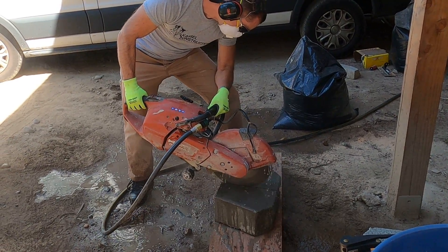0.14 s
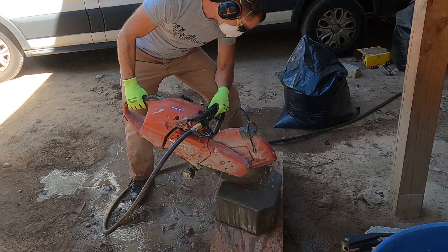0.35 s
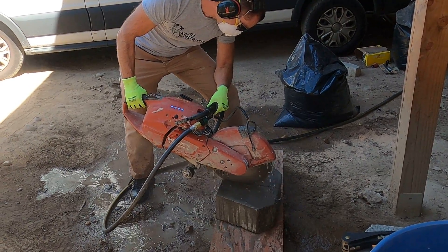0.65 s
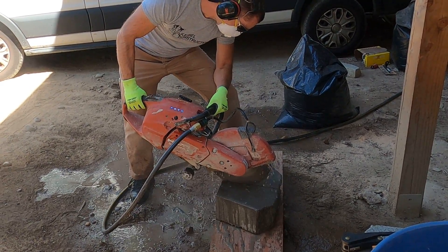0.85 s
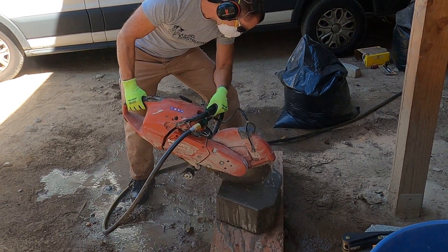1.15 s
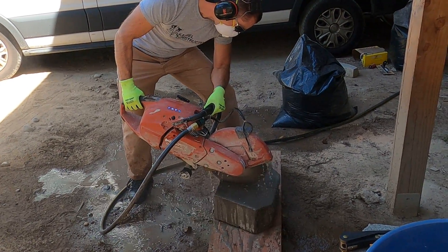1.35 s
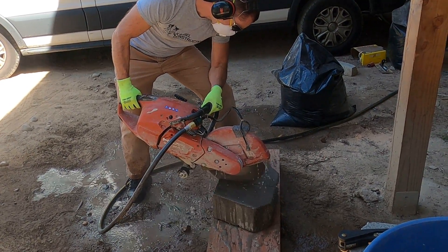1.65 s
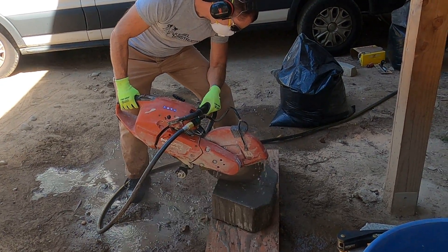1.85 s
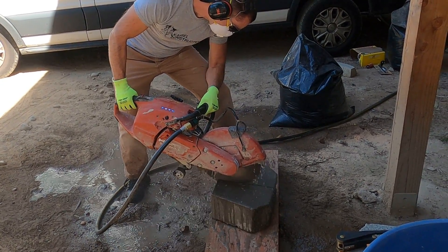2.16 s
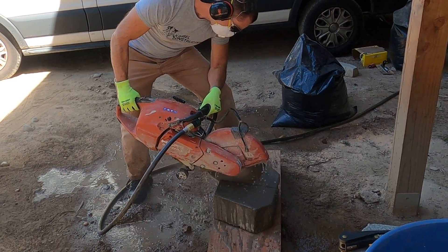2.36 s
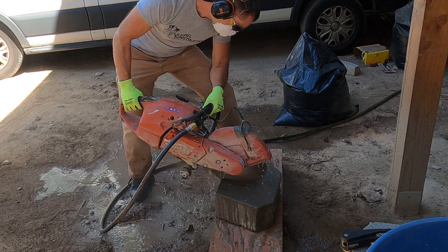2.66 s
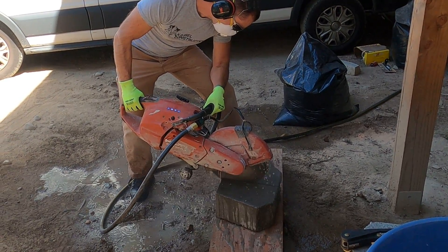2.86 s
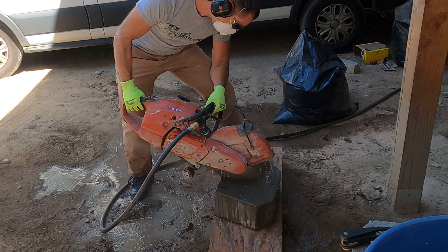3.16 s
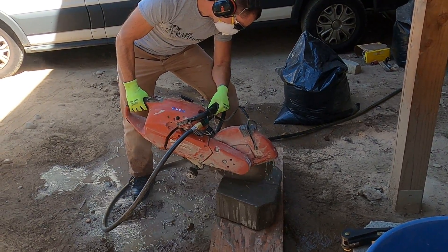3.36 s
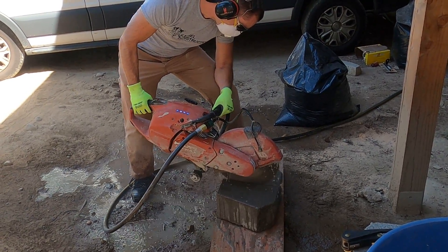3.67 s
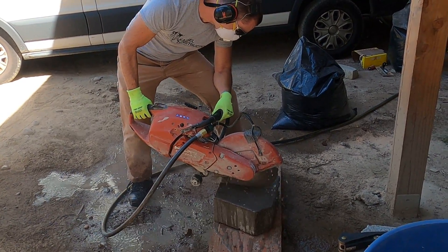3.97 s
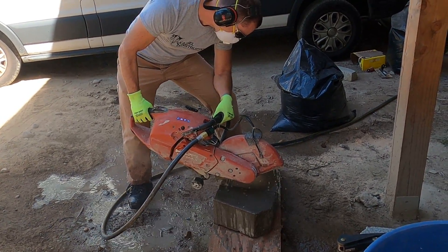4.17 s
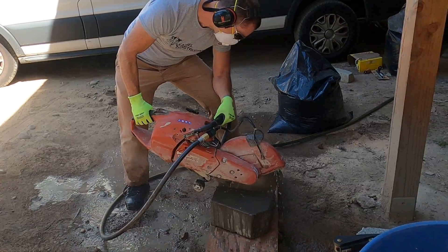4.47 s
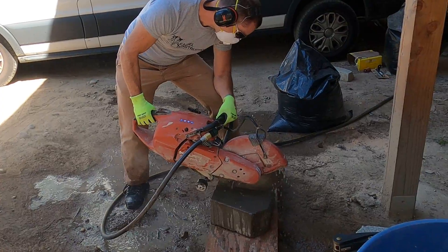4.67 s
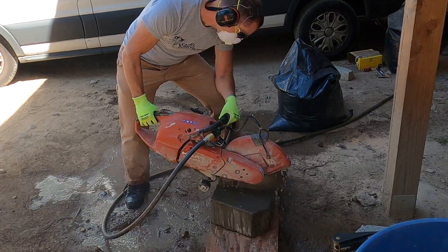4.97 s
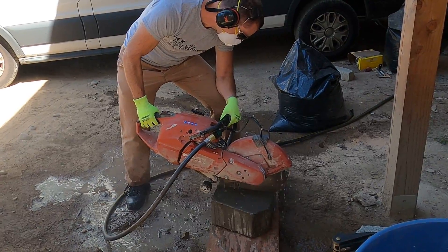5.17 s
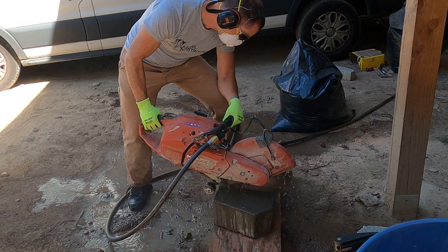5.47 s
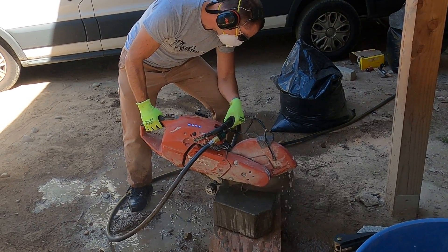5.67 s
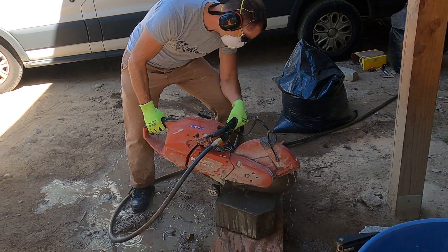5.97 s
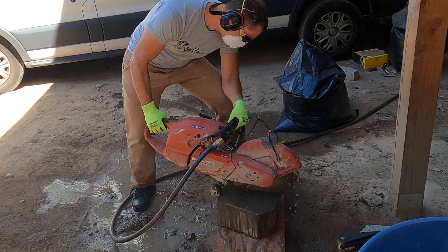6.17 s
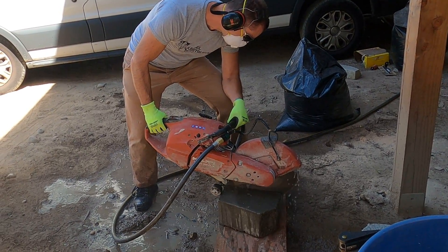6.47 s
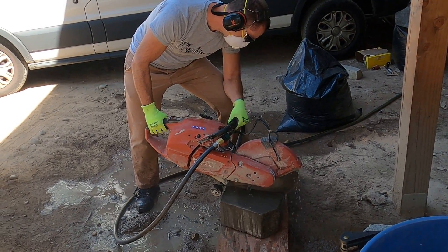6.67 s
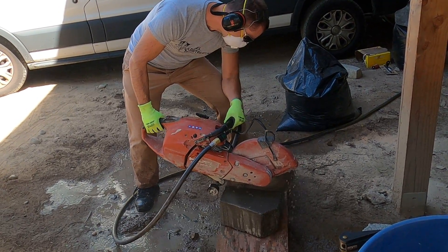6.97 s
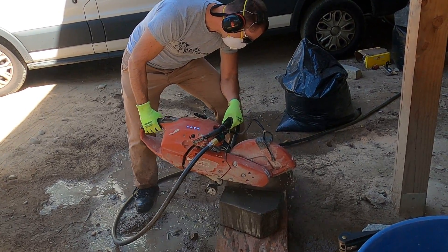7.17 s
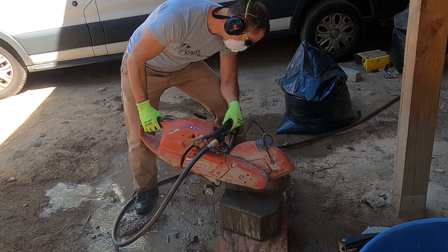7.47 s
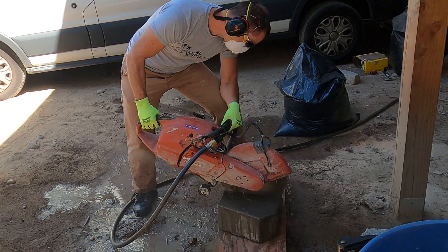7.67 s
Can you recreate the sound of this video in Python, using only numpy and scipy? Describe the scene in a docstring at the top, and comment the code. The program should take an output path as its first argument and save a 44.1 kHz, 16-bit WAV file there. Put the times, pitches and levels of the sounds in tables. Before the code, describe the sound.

Close, harsh roar of a saw blade tearing concrete, with sagging engine drone and faint water hiss, ending in a rising rev.

```python
"""Petrol saw cutting concrete

Grit tears at the rim of a saw blade: random clicks ring the steel blade and its guard, over broad noise.
A one-cylinder engine, built from sine waves, sags under load and revs up as the blade runs out of the cut.
Water spray hisses as filtered clicks; so does an airy top-treble hiss, stronger on the left.
A small microphone pair close by cuts the bass, and the peaks are evened out.
"""
import sys
import numpy as np
from scipy import signal
from scipy.fft import rfft, irfft, next_fast_len
from scipy.io import wavfile
from scipy.ndimage import uniform_filter1d, minimum_filter1d

SR = 44100
rng = np.random.default_rng(int(sys.argv[2]) if len(sys.argv) > 2 else 0)


def to_wav(s):
    """Save 16-bit WAV."""
    ch = np.atleast_2d(s).T  # columns
    pcm = np.round(np.clip(ch, -1, 1) * 32767)  # PCM
    wavfile.write(sys.argv[1], SR, pcm.astype(np.int16))


N = 344862

# All levels in the tables are relative: later gains add to them.
# Progress of the cut: (time [s], depth [0-1], run-out [0-1])
CUT_PROGRESS = [(0, 0.3, 0), (1, 0.6, 0.06), (2, 0.63, 0.04), (3, 0.64, 0.09), (4, 0.88, 0.03),
                (5, 0.92, 0), (6.1, 1, 0.09), (6.5, 0.98, 0.35), (6.8, 0.56, 0.29), (7.2, 0.66, 0.54),
                (7.82, 1, 0.54)]
# Engine speed: (time [s], firing rate [Hz])
ENGINE_SPEED = [(0.0, 87.8), (0.6, 86.6), (1.0, 85.2), (1.22, 85.7), (1.61, 83.3), (2.4, 81.6), (2.6, 80.6),
                (3.5, 79.6), (3.72, 78.0), (4.35, 78.3), (4.7, 76.6), (5.34, 76.8), (5.9, 78.0),
                (6.16, 77.2), (6.38, 85.2), (6.64, 97.6), (6.79, 108.9), (7.1, 127.9), (7.19, 132.0),
                (7.49, 135.5), (7.62, 138.0), (7.82, 140.4)]
# Loudness over time: (time [s], grinding [dB], spray and airy hiss [dB])
LOUDNESS_CURVE = [(0, -13, -32), (1.5, -14, -30.5), (3.2, -13.5, -29), (4.7, -15, -29.5), (6, -15, -30.5),
                  (6.8, -12, -31), (7.82, -13, -33.5)]
# Brief changes of the grinding, nearly all dips: (time [s], level [dB], half width [s])
GRINDING_DIPS = [(.07, -3, .03), (.38, -3, 0.015), (.83, -2, 0.026), (1.42, 0.5, .02), (2.29, -0.5, .02),
                 (2.86, -2.5, 0.048), (4.39, -0.5, .03), (4.86, -1, 0.035), (6.75, -3.5, 0.027),
                 (7.41, -4, 0.018)]

# Ringing pitches (modes) of the steel blade and of its guard: (pitch [Hz])
BLADE_PITCHES = [3850, 3970, 4182, 4290, 4380, 4455, 4530, 4655, 4775, 4920, 5050, 5145, 5255, 5660, 5750,
                 5940, 6170, 6240, 6520, 6780, 7295, 7555, 7740, 8110, 8420, 8680, 9165, 9360, 9670, 10870,
                 11470]
GUARD_PITCHES = [535, 778, 1575, 1760, 2020, 2380, 2570, 2830, 2965, 3180, 3320, 3470, 3660]
# How the grit rings each of those pitches, one row a pitch:
# (width [Hz], shallow cut [dB per Hz], deep cut [dB per Hz], running free [dB per Hz])
BLADE_MODES = [(97, -58, -50, -65), (223, -54.5, -44, -46), (60, -36, -38, -67), (121, -51, -43.5, -43.5),
               (70, -58, -67, -47), (50, -38, -39, -69), (63, -34.5, -41.5, -55), (38.6, -47, -34, -55),
               (46.4, -35.5, -47.5, -69), (90, -47, -45, -70), (81, -58.5, -37.5, -60), (47, -46, -38, -56),
               (60, -55, -44, -75), (70, -53.5, -48, -61), (80, -55, -45.5, -58), (202, -82, -48.5, -55.5),
               (70, -72, -65, -81), (58, -62, -44, -82), (69, -52, -51.5, -69), (60, -59, -56, -72),
               (70, -64.5, -57.5, -71), (70, -58.5, -59, -71), (50, -73, -69, -74), (90, -65, -65, -70),
               (70, -76, -60, -69), (70, -91, -74, -66), (60, -68, -57.5, -69), (50, -70, -57, -74),
               (70, -73, -70, -77), (100, -67, -64.5, -74), (140, -68, -64, -78)]
GUARD_MODES = [(86, -43, -50, -60.5), (59, -50.5, -52.5, -55), (86, -47, -51, -61), (29.7, -48, -58, -47),
               (107, -48, -41.5, -55), (137, -45, -44.5, -48.5), (139, -47.5, -51, -48),
               (61.5, -55, -53, -48), (56, -56, -52, -46), (72, -64, -61, -28), (95, -56.5, -44.5, -54),
               (86, -63, -44.5, -58), (91, -55, -43, -48)]
# Blade pitches move as it spins faster: (pitch [Hz], shift when the squared speed doubles [share of pitch])
SPIN_SHIFTS = [(4500, 0.0028), (5200, 0.014), (7300, 0.0064), (9200, -0.0061)]
# Pitches that slide as the kerf (the slot) deepens: pitch [Hz]: slide over the whole depth [Hz]
KERF_SLIDES = {2020: 70, 4182: 35, 4530: 80, 4775: 100, 5145: 50, 5750: -80, 7295: -110, 7555: 60, 9165:
               -90}
# Pitches that ring up for a while: pitch [Hz]: (time [s], level [dB], half width [s])
RINGING_SWELLS = {2020: (5.9, 3.5, 0.65), 4182: (4.8, 2, 0.75), 4655: (2.4, 1.7, 0.7),
                  4775: (3.2, 5.8, 0.72), 5050: (2.4, 3.4, 0.76), 6240: (3.8, 3, 1), 6520: (3, 4, 0.51),
                  7295: (1.0, 3, 1.0), 7555: (4.45, 8.4, 0.28), 8110: (5, 3.3, .8), 8420: (6, 2.5, .7),
                  8680: (.4, 8, .7), 9165: (2.2, 7.5, 0.91), 9360: (2.4, 8.2, 1.2)}
# Broad tearing noise in the cut: (pitch [Hz], level [dB per Hz])
GRIT_SPECTRUM = [(300, -10.5), (540, -1.5), (640, -7.5), (780, -3), (1090, -8), (1500, -3), (2300, 1.5),
                 (3100, -6.5), (3700, 2.5), (4700, -1.5), (5450, -5), (6600, -6.5), (6950, -29),
                 (9000, -55)]
# Broad noise of the free-running saw: (pitch [Hz], level [dB per Hz])
WHIRR_SPECTRUM = [(180, -69), (300, -35), (325, -5), (408, -2.5), (449, -14), (527, 2), (579, -5.5),
                  (727, 5.5), (1150, -11), (1350, 3), (1540, -17), (1960, -31), (4270, -9), (5600, -18),
                  (7400, -19), (9620, -55), (16300, -120)]

# Colour the exhaust pipe gives the firing orders (multiples of the firing rate): (pitch [Hz], level [dB])
PIPE_SPECTRUM = [(300, -6.5), (400, -8.5), (470, -0.5), (580, 0.5), (640, -8), (760, -1.5), (1000, -13),
                 (1500, -23.5), (1780, -10), (2000, -17), (2600, -25)]
# Level of all firing orders: (lightly loaded [dB], bogged down [dB], revving free [dB])
ENGINE_LEVELS = (-31, -34.5, -26.5)
# Narrow muffler tones; each triple is lightly loaded, bogged down, revving free:
# (three pitches [Hz], width [Hz], three levels [dB], gain while speeding up [dB])
MUFFLER_TONES = [((365, 367, 370), 28, (-36, -35, -36), 9.6), ((528, 463, 537), 95, (-23, -31.5, -37),
                 18.4), ((1195, 1196, 1060), 114, (-24, -42, -39), 5.7), ((1333, 1333, 1357),
                 160, (-24.5, -28.5, -17.5), 1.7)]
# Each order against the pipe's colour, from the third order up:
# (lightly loaded [dB], half loaded [dB], bogged down [dB], revving free [dB])
ORDER_LEVELS = [(10, 19, 18, 2.5), (3, 1.5, -0.5, -3), (1.5, -11, -3.5, -1.5), (-1, -2.5, -0.5, 2),
                (7, -0.5, 3, -7), (-2, 6, 2.5, 1.5), (0, -8, 2, -3), (3, -4, 3, 2), (6, 3, 0, 3),
                (5, 6, 3.5, -5), (-8, 1, -5, 4), (-3, 2, 3.5, -8), (-11, -4.5, -3.5, 8), (1, -20, -1.5, 15),
                (1, -3, -0.5, 5), (0, -3, -0.5, 4), (-2, -2, 4, 6), (2, 0, 0, 0), (-10, -2, 0, 5),
                (8, 0, 0, 0)]
# Orders that flare up or fade for a moment: order: (time [s], level [dB], half width [s])
ORDER_FLARES = {3: (6.87, 3, .08), 4: (6.53, 6, .09), 5: (6.75, 7, .12), 6: (6.4, 4, .1), 7: (0.6, -3, .7),
                8: (6.35, 5, .12), 9: (6.33, 6, .12), 10: (6.8, 6, .1), 12: (6.82, 3, .06),
                13: (6.5, 3, .1), 14: (6.62, 4, .09), 15: (2.9, 3, .5), 16: (6.75, 5, .12),
                17: (6.25, 7, .09)}

# Spray hiss common to both sides: (pitch [Hz], level [dB per Hz])
SPRAY_SPECTRUM = [(5500, -16), (7000, -10.5), (7500, -3.5), (7950, -10), (9000, -4), (10150, -5.5),
                  (11000, -8.5), (12500, -12), (12850, -13), (14000, -23), (15200, -40)]
# Airy top-treble hiss, stronger on the left: (pitch [Hz], level [dB per Hz])
AIRY_SPECTRUM = [(10500, -31), (11100, -1), (11800, -5), (12500, -1), (13300, 3), (14200, -20), (15200, -3)]

LIGHT_HZ, HALF_HZ, BOGGED_HZ, FREE_HZ = 87.5, 81.5, 77, 125  # firing rates of the engine's states
RUN_OUT_S = 6.15  # when the engine starts to rev
LOAD_POWER = 6  # the engine's colour changes late in the sag
SURGE_HZ_PER_S = 99  # rise of firing rate that counts as full speeding-up
BLADE_TURNS = .5  # blade turns per firing, set by the belt
MID_DEPTH = .6  # depth at which sliding pitches have their listed value
HISS_DIPS = 1.2  # both hisses dip this many times as deep as the grinding
BASS_CUT_HZ, CUTOFF_HZ = 322, 15150


def amp(db):
    """Turn a level in dB into a gain."""
    return 10 ** (np.asarray(db) / 20)


def rms_one(x):
    """Scale a sound to an average strength (rms) of 1."""
    return x / np.sqrt(np.mean(x ** 2) + 1e-20)


def in_time(rows):
    """Read the columns of a time table as curves, one value a sample."""
    s, *columns = np.transpose(rows)
    return [np.interp(np.arange(N) / SR, s, column) for column in columns]


def at_hz(points, hz):
    """Read a spectrum table at given pitches, on a log-frequency axis."""
    table_hz, values = np.array(points).T
    return np.interp(np.log(hz), np.log(table_hz), values)


def bump(s, db, width_s):
    """Make a smooth rise or dip in dB around one moment."""
    return db * np.exp(-((np.arange(N) / SR - s) / width_s) ** 2)


def drift(rate_hz):
    """Make slow random wandering of rms 1: noise smoothed twice by a one-pole low-pass."""
    # one value per 64 samples is enough; the first 1500 let the filter settle
    r = np.exp(-128 * np.pi * rate_hz / SR)
    noise = rng.standard_normal(N // 64 + 1502)
    slow = signal.lfilter([1], [1, -2 * r, r * r], noise)[1500:]
    return np.interp(np.arange(N) / 64, np.arange(len(slow)), rms_one(slow))


def coloured(x, spectrum):
    """Filter a noise by a spectrum table and scale it to rms 1."""
    size = next_fast_len(N)
    hz = np.maximum(np.arange(size // 2 + 1) * SR / size, 1)
    filtered = irfft(rfft(x, size) * amp(at_hz(spectrum, hz)), size)[:N]
    return rms_one(filtered)


def grains(per_s, spread_db):
    """Make random clicks of uneven size and either sign, with rms 1."""
    sizes = amp(spread_db * np.minimum(rng.exponential(1, N), 5)) * rng.choice([-1, 1], N)
    happens = rng.random(N) < per_s / SR
    return rms_one(sizes * happens)


def rings(pitches, modes, drives, depth, free, flicker_db, wander, spin=0):
    """Ring metal with grit: each mode is a resonance applied twice, and its level and pitch wander."""
    out = np.zeros(N)
    reach = np.maximum.accumulate(depth) - MID_DEPTH  # deepest point of the kerf so far
    for k, (hz, (width_hz, shallow_db, deep_db, free_db)) in enumerate(zip(pitches, modes)):
        r = np.exp(-np.pi * width_hz / SR)
        pitch_share = 1 + at_hz(SPIN_SHIFTS, hz) * spin + wander * drift(0.56)
        moving_hz = KERF_SLIDES.get(hz, 0) * reach + hz * pitch_share
        carrier = np.exp(2j * np.pi * np.cumsum(moving_hz) / SR)
        # shifted down by the moving pitch, low-passed and shifted back: a resonance that glides
        shifted = drives[k % len(drives)] / carrier
        slow = signal.lfilter([(1 - r) ** 2], [1, -2 * r, r * r], shifted)
        cut_db = shallow_db + depth * (deep_db - shallow_db)
        level_db = (1 - free) * cut_db + free * free_db
        if hz in RINGING_SWELLS:
            level_db = level_db + bump(*RINGING_SWELLS[hz])
        gain = np.sqrt(2 * SR) * amp(level_db + flicker_db * drift(4.6))
        out += gain * (slow * carrier).real
    return out


def grinding(bite, firing, depth, free):
    """Grit strikes as random clicks, ringing blade and guard; the same clicks feed the broad noise."""
    drives = [bite * grains(12000, spread_db=4.0) for _ in range(4)]
    spin = ((firing / LIGHT_HZ) ** 2 - 1).clip(0)  # rise of the squared speed
    blade = rings(BLADE_PITCHES, BLADE_MODES, drives, depth, free, flicker_db=1.85, wander=0.0015, spin=spin)
    guard = rings(GUARD_PITCHES, GUARD_MODES, drives[::-1], depth, free, flicker_db=1.5, wander=0.0086)
    tearing = np.sqrt(1 - free) * amp(-2.0) * coloured(drives[0], GRIT_SPECTRUM)
    whirr = np.sqrt(free) * amp(-7.0) * coloured(drives[1], WHIRR_SPECTRUM)
    return amp(14.5) * (blade + guard) + tearing + whirr


def by_state(values, load, rev):
    """Move a value from lightly loaded to bogged down as the engine sags, then to free as it revs."""
    light, bogged, free = values
    return (1 - rev) * (light + load * (bogged - light)) + rev * free


def exhaust(firing, turns):
    """Firing orders are wavering sines; each takes the gain of the pipe at its present pitch."""
    out = np.zeros(N)
    cutting = np.arange(N) < RUN_OUT_S * SR
    sag_share = np.clip((LIGHT_HZ - firing) / (LIGHT_HZ - BOGGED_HZ), 0, 1)
    load = np.where(cutting, sag_share ** LOAD_POWER, 1)
    rev = np.where(cutting, 0, np.clip((firing - BOGGED_HZ) / (FREE_HZ - BOGGED_HZ), 0, 1))
    speeding_up = uniform_filter1d(np.gradient(firing) * SR, size=SR // 5)
    surge = np.clip(speeding_up / SURGE_HZ_PER_S, 0, 1)
    level_db = by_state(ENGINE_LEVELS, load, rev)
    sag_hz = np.where(cutting, firing, BOGGED_HZ)
    tones = []
    for pitches_hz, width_hz, levels_db, surge_db in MUFFLER_TONES:
        tone = amp(by_state(levels_db, load, rev) + surge_db * surge)
        tones.append((by_state(pitches_hz, load, rev), 2 / width_hz, tone))
    for order, (light_db, half_db, bogged_db, free_db) in enumerate(ORDER_LEVELS, start=3):
        hz = order * firing
        gain = amp(level_db + at_hz(PIPE_SPECTRUM, hz) + 1.5 * drift(1.7))
        for centre_hz, sharpness, tone in tones:
            gain = gain + tone / (1 + ((hz - centre_hz) * sharpness) ** 2) ** 2
        sag_db = np.interp(sag_hz, [BOGGED_HZ, HALF_HZ, LIGHT_HZ], [bogged_db, half_db, light_db])
        own_db = (1 - rev) * sag_db + rev * free_db
        if order in ORDER_FLARES:
            own_db = own_db + bump(*ORDER_FLARES[order])
        waver = amp(own_db + .8 * drift(4.0))
        phase_wander = 0.12 * np.sqrt(order) * drift(5.3)  # radians
        out += gain * waver * np.sin(2 * np.pi * (order * turns + rng.random()) + phase_wander)
    return out


def spray_hiss(flicker):
    """Spray is a dense patter of random clicks, filtered to a treble hiss that flickers."""
    return amp(-1.0) * flicker * coloured(grains(9000, spread_db=-1.0), SPRAY_SPECTRUM)


def airy_hiss(flicker):
    """An airy top-treble hiss: dense random clicks, filtered, with extra flicker in level."""
    extra_flicker = amp(2.9 * drift(7.5))
    return amp(-5) * flicker * extra_flicker * coloured(grains(8300, spread_db=6.5), AIRY_SPECTRUM)


def scene():
    """Put grinding, engine and spray in the middle; the airy hiss is stronger on the left."""
    firing, = in_time(ENGINE_SPEED)
    turns = np.cumsum(firing) / SR  # firings so far
    dips_db = sum(bump(*dip) for dip in GRINDING_DIPS)
    depth, free = np.clip(in_time(CUT_PROGRESS), 0, 1)
    grind_db, hiss_db = in_time(LOUDNESS_CURVE)
    # the rim is slightly out of round, so it bites harder once a turn; each firing adds a jolt
    rim_db = 1.2 * np.sin(2 * np.pi * BLADE_TURNS * turns)
    jolt_db = 1.2 * np.sin(2 * np.pi * turns)
    bite = amp(rim_db + jolt_db + 0.68 * drift(7.0))
    grind = amp(grind_db + dips_db) * grinding(bite, firing, depth, free)
    engine = exhaust(firing, turns)
    flicker = amp(hiss_db + HISS_DIPS * dips_db) * bite * amp(0.63 * drift(30.0))
    middle = grind + engine + spray_hiss(flicker)
    # left in full; right faint and upside down
    return middle + airy_hiss(flicker) * np.array([[1], [-.15]])


def record(dry):
    """A fast limiter evens the peaks; the bass is cut steeply, the tallest peaks are rounded, the top is cut."""
    hold = round(.004 * SR)  # 4 ms in samples
    peak = -minimum_filter1d(-np.abs(dry).max(axis=0), hold)
    gain = uniform_filter1d(np.minimum(1, (.62 / peak) ** .45), hold)
    bass_cut = signal.ellip(8, .5, 50, BASS_CUT_HZ, "high", fs=SR, output="sos")
    x = signal.sosfilt(bass_cut, gain * dry)
    x = x / (1 + np.abs(x / .95) ** 10.0) ** .1
    top_cut = signal.ellip(10, .5, 70, CUTOFF_HZ, fs=SR, output="sos")
    return signal.sosfilt(top_cut, x)


dry = scene()
out = record(dry)
to_wav(out)
```